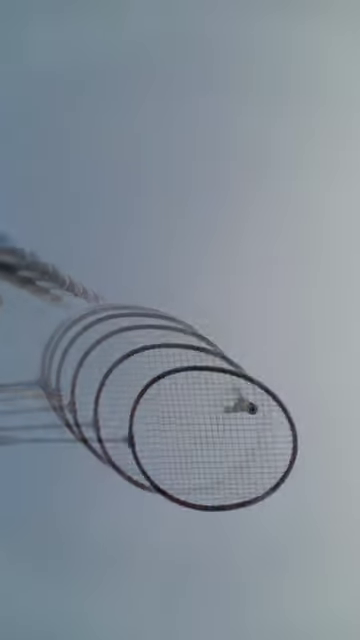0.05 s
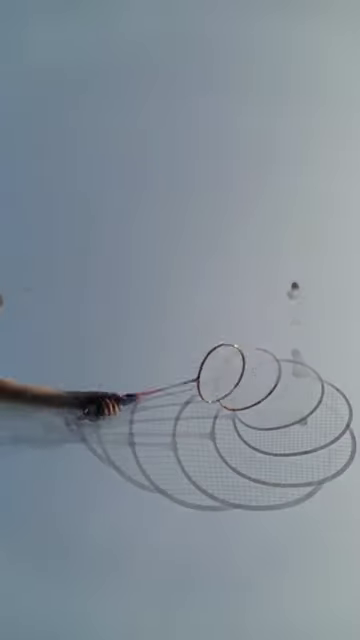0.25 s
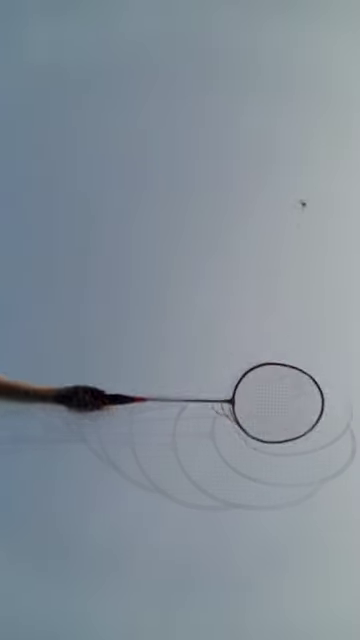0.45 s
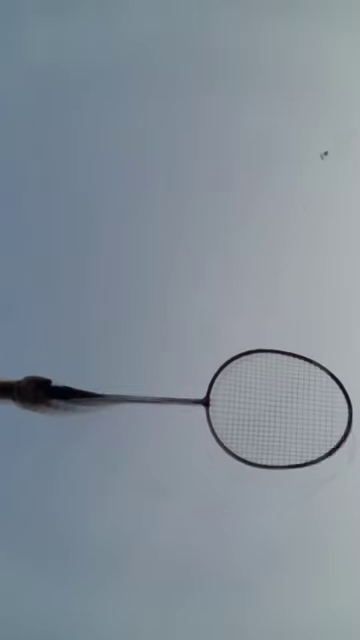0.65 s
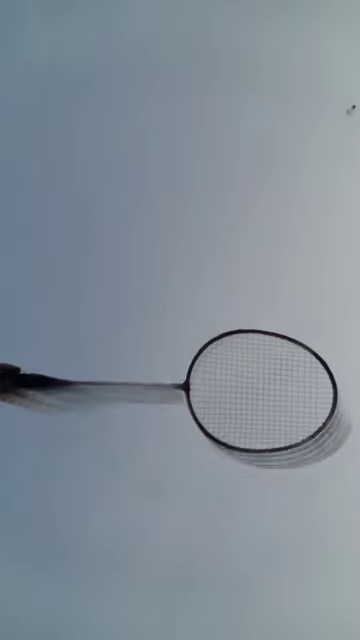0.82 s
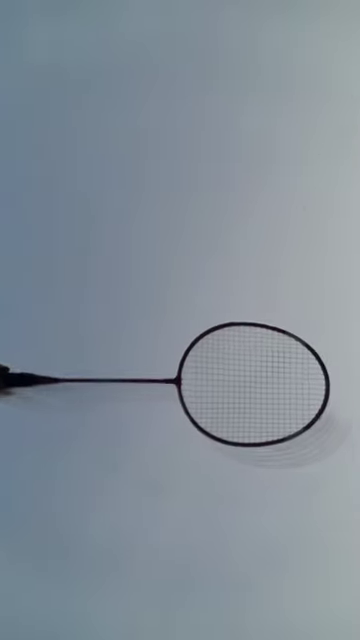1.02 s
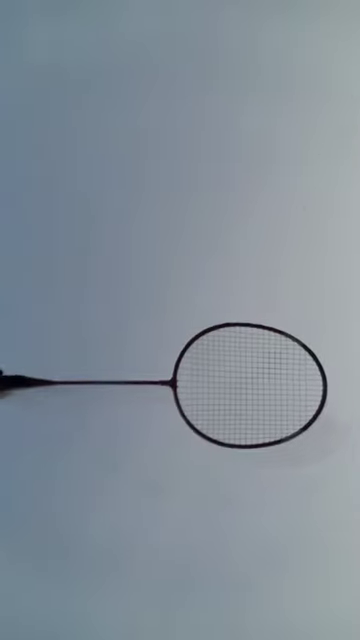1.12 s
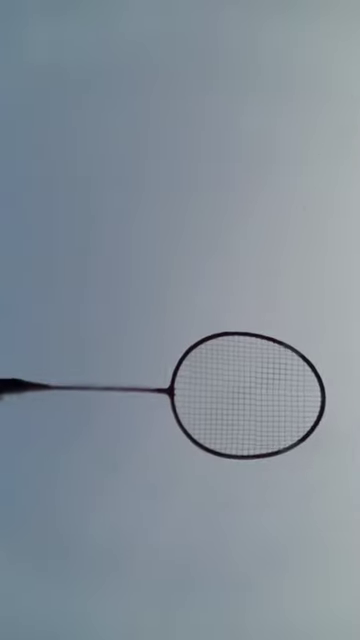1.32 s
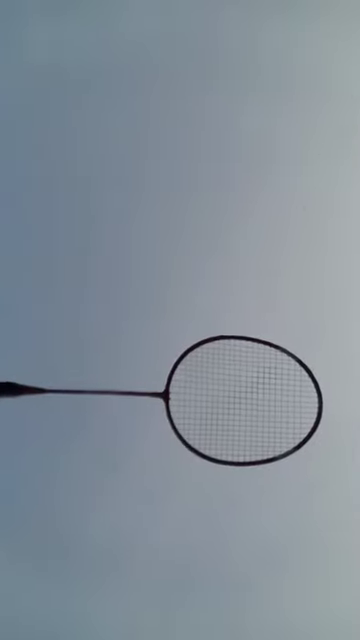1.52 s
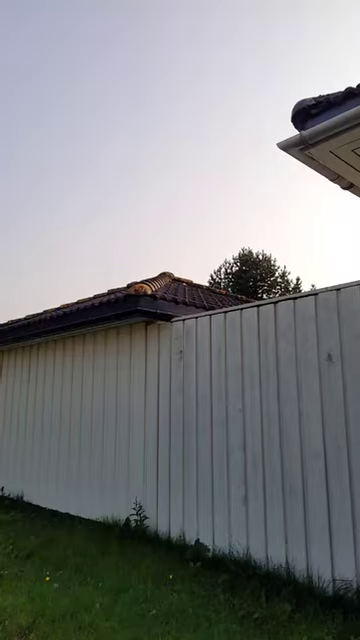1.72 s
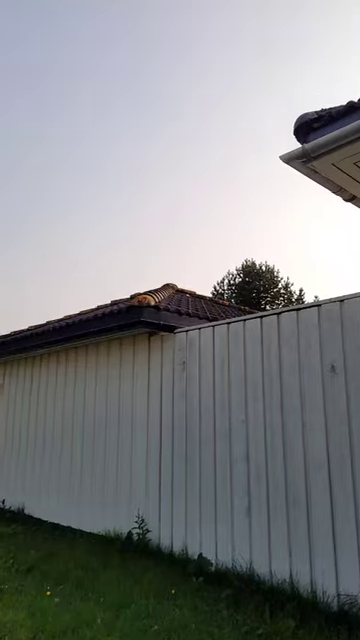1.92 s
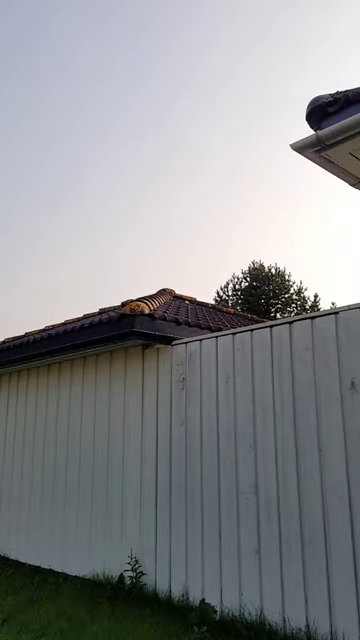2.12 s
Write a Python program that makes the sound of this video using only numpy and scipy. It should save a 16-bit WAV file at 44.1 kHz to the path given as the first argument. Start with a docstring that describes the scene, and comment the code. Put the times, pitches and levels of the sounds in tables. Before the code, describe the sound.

A badminton racket swishes and strikes a shuttlecock once, a sharp crack with a brief ping of strings. Faint finger ticks and sleeve rustles on the microphone follow, over a low rumble in a still garden.

```python
"""Over a low rumble in a still garden, a badminton racket swishes up and strikes a shuttlecock once. Cork and
feathers crack on the strings, the recoiling string bed thumps the air, and its modes ring while a fence and
a house reflect the crack. The lowest mode fades and swells again as the racket face turns, and the racket
swings softly back. Fingers then tick and a sleeve rustles on the microphone's case, and a far drone swells
once. After a brief silence the background is quieter, with a far machine hum and a last few ticks."""
import sys
import numpy as np
from scipy import signal
from scipy.fft import rfft, irfft
from scipy.io import wavfile

SR = 44100
rng = np.random.default_rng(int(sys.argv[2]) if len(sys.argv) > 2 else 0)


def wav_out(sig):
    """Save sig, one row per channel (or a flat mono array), as 16-bit PCM at SR to the path in sys.argv[1]."""
    wavfile.write(sys.argv[1], SR, np.round(np.clip(np.atleast_2d(sig).T, -1, 1) * 32767).astype(np.int16))


N = 94815
T = np.arange(N) / SR
HIT_S, BREAK_S, RESUME_S = 0.2393, 1.75, 1.776   # first touch of the shuttle; start and end of the silence
BED_PAN_DB, AIR_LIKENESS = -1.83, 0.76


def from_db(db):
    """Amplitude ratio of a level in decibels."""
    return 10 ** (np.asarray(db) / 20)


def rms_one(x):
    """Normalisation to unit rms."""
    return x / np.sqrt(np.mean(x ** 2) + 1e-20)


def in_time(rows):
    """Linear interpolation of each column after the time column, at every sample."""
    s, *columns = np.transpose(rows)
    return [np.interp(T, s, c) for c in columns]


def pan(db):
    """Level difference between the ears: left and right gains, positive leaning left."""
    return from_db(np.array([[db], [-db]]))


def envelope(start, rise, hold, t60):
    """Linear rise, hold, then exponential decay of 60 dB in t60; all in seconds."""
    t = T - start
    return np.clip(t / rise, 0, 1) * 1e-3 ** (np.maximum(t - rise - hold, 0) / t60)


def stereo(three, likeness):
    """Partial coherence: the ears share one signal (power fraction likeness) and each has its own."""
    return np.sqrt(likeness) * three[0] + np.sqrt(1 - likeness) * three[1:]


def noise(likeness):
    """White noise, partly coherent between the ears."""
    return stereo(rng.standard_normal((3, N)), likeness)


def grains(per_s, likeness):
    """Shot noise: random stereo impulses of either sign."""
    occurs = rng.random((3, N)) < per_s / SR
    return stereo(occurs * rng.choice([-1, 1], (3, N)), likeness)


def colour(x, spectrum):
    """Spectral shaping to unit rms. Each row: frequency in Hz, relative spectral density in dB."""
    hz, db = np.transpose(spectrum)
    f = np.maximum(np.arange(N // 2 + 1) * SR / N, 1)
    gain = from_db(np.interp(np.log(f), np.log(hz), db)) * (f > 10)
    return rms_one(irfft(rfft(x) * gain, N))


def resonance(x, hz, width_hz):
    """Damped oscillator: a unit impulse starts a decaying sine of height 1."""
    r, w = np.exp(-np.pi * width_hz / SR), 2 * np.pi * hz / SR
    return signal.lfilter([0, np.sin(w)], [1, -2 * r * np.cos(w), r * r], x + 1e-18)


def delayed(x, seconds):
    """Pure delay: a phase lag proportional to frequency."""
    hz = np.arange(N + 1) * SR / (2 * N)
    return irfft(rfft(x, 2 * N) * np.exp(-2j * np.pi * hz * seconds))[:N]


def crack():
    """Impact noise: cork and feathers rattle across the strings in a burst of tiny collisions."""
    # Each row: frequency in Hz, relative spectral density in dB.
    spectrum = [(300, -5.5), (800, -7.5), (1250, -1), (2200, -1), (2800, 2), (4500, 3.5), (5600, -6),
                (6700, -2), (8700, -22), (9400, -19.5), (10400, -16.5), (12500, -21.5), (14200, -11),
                (15300, -6), (16000, -19)]
    rattle = colour(grains(per_s=2900, likeness=0.59), spectrum)
    return from_db(-32.5) * pan(0.56) * rattle * envelope(HIT_S, rise=0.0017, hold=0.005, t60=0.02)


def thump():
    """Elastic rebound: the bed throws the shuttle back and pushes the air, over the head's slower recoil."""
    peak_s, rise_s, fall_s, push_hz = 0.2455, 0.0026, 0.0021, 343.2
    recoil_hz, recoil_width_s = 139, 0.0041
    t = T - peak_s
    pulse = np.exp(-(t / np.where(t < 0, rise_s, fall_s)) ** 2)
    push = np.cos(2 * np.pi * push_hz * t) * pulse
    recoil = np.cos(2 * np.pi * recoil_hz * t) * np.exp(-(t / recoil_width_s) ** 2)
    return from_db(-20) * push * pan(BED_PAN_DB) + from_db(-34) * recoil


def racket_modes():
    """Free vibration: the frame's modes and the string bed's upper modes ring and are quickly damped."""
    # Each row: frequency in Hz, level in dB, time to decay by 60 dB in seconds.
    modes = [(220, -41, .1), (623, -49, .21), (672, -44, .24), (834, -53, .2), (931, -47, .21),
             (982, -52, .2), (1040, -46.5, .28), (1093, -52, .18), (1185, -49, .25), (1238, -47, .09),
             (1448, -49, .13), (1941, -43, .06), (2180, -51, .11), (2688, -42, .065), (3420, -44, .08),
             (4075, -47, .06), (4918, -44, .055)]
    return sum(from_db(db) * np.sin(2 * np.pi * (hz * T + rng.random()))
               * envelope(HIT_S + 0.0021, rise=0.0037, hold=0, t60=t60) for hz, db, t60 in modes)


def ping():
    """Directivity: the bed's lowest mode fades as the face turns edge-on and swells as it turns back."""
    # Each row: time in seconds, frequency in Hz, rms level in dB.
    lowest_mode = [(.24, 393, -39.5), (.27, 417.4, -41.5), (.305, 412, -45.5), (.35, 417.7, -59),
                   (.395, 420, -73), (.47, 426.3, -62.5), (.55, 427.3, -65.5), (.62, 429, -81),
                   (.8, 422.6, -100)]
    hz, db = in_time(lowest_mode)
    contact_s, rise_s = 0.007975, 0.00437
    t = T - HIT_S - contact_s   # it rings once the shuttle has left
    phase = 2 * np.pi * np.cumsum(hz * (t > 0)) / SR
    return np.sqrt(2) * from_db(db) * np.sin(phase) * np.clip(t / rise_s, 0, 1) * pan(BED_PAN_DB)


def echoes():
    """Specular reflection: fence and house return the first snap of the crack with a woody knock."""
    # Each row: delay in seconds, gain in dB.
    reflections = [(0.0393, -57), (0.0485, -43.5), (0.051, -51.5), (0.107, -67)]
    # Each row: frequency in Hz, relative spectral density in dB.
    spectrum = [(400, 0.5), (1300, 3), (3000, -7), (6500, -6.5), (9000, -15), (15000, -12.5)]
    knock_hz = 1405.5
    snap = colour(noise(likeness=0.18), spectrum)
    knock = from_db(5.5) * np.sin(2 * np.pi * knock_hz * T)
    return sum(from_db(db) * (snap * envelope(HIT_S + s, rise=0.00033, hold=0.0006, t60=0.013)
                              + knock * envelope(HIT_S + s, rise=0.0002, hold=0, t60=0.0051))
               for s, db in reflections)


def scatter():
    """Diffuse scattering: grass and bushes spread the crack into a short, dull tail."""
    # Each row: frequency in Hz, relative spectral density in dB.
    spectrum = [(150, -2), (400, 1), (1100, 2.5), (1800, -7.5), (4000, -13.5), (8000, -25.5),
                (15000, -23.5)]
    tail = colour(noise(likeness=0.3), spectrum)
    return from_db(-46.5) * tail * envelope(HIT_S, rise=0.0062, hold=0.0037, t60=0.26)


def swish():
    """Flow noise: air through the strings swells with the swing, and softly again on the way back."""
    # Each row of both: frequency in Hz, relative spectral density in dB.
    swing_spectrum = [(80, -6), (250, -8), (800, -21), (12000, -40.5)]
    back_spectrum = [(250, -4), (750, -3), (1500, -23), (9000, -24)]
    swing_s = 0.21
    swing_level = from_db(-68.5) * envelope(HIT_S - swing_s, swing_s, 0, 0.16) ** 2
    back_level = from_db(-81) * envelope(start=0.5, rise=0.2, hold=0.17, t60=0.53)
    swing = swing_level * colour(noise(AIR_LIKENESS), swing_spectrum)
    return swing + back_level * colour(noise(AIR_LIKENESS), back_spectrum)


def case(clicks, hard_db):
    """Resonance of the microphone's case: soft contacts favour its lower mode, hard ones a bare snap."""
    # Each row: frequency in Hz, bandwidth in Hz.
    modes = [(4400, 650), (6450, 590)]
    lower, upper = (resonance(clicks, hz, width_hz) for hz, width_hz in modes)
    snap = signal.sosfilt(signal.butter(2, 4000, "high", fs=SR, output="sos"), clicks + 1e-18)
    return from_db(-hard_db) * lower + upper + from_db(hard_db - 1) * snap


def ticks():
    """Impulse excitation: each sharp touch of a finger sets the case ringing."""
    # Each row: start in seconds, gain in dB, hardness in dB.
    touches = [(0.7433, -51.5, 10), (0.775, -65.5, 7.5), (.841, -62.5, 4), (1.308, -73, 18),
               (1.4025, -71, -0.5), (1.557, -70, 10), (2.059, -60, -8), (2.099, -58.5, 3),
               (2.1066, -65.5, -8), (2.119, -69, -6), (2.1372, -56, 6), (2.1453, -68.5, -7)]
    right = sum(from_db(db) * case(signal.unit_impulse(N, int(s * SR)), hard_db)
                for s, db, hard_db in touches)
    return np.array([delayed(right, seconds=0.00018), right])   # the hand is nearer the right side


def rustles():
    """Stick-slip friction: a sleeve slides over the case in tiny slips."""
    # Each row: start in seconds, hold in seconds, level in dB, hardness in dB.
    slides = [(0.742, 0.028, -84.5, -1.5), (1.232, 0.04, -81, 2), (1.262, 0.044, -84, 14),
              (1.399, 0.057, -87, 2), (1.537, 0.045, -88, 6.5), (2.055, 0.09, -81, -2)]
    slips = grains(per_s=2100, likeness=0.19)
    return sum(from_db(db) * rms_one(case(slips, hard_db)) * envelope(s, rise=0.0099, hold=hold, t60=0.22)
               for s, hold, db, hard_db in slides)


def drone():
    """Narrow-band noise: a faint, uneven low tone swells once, far away."""
    band = rms_one(resonance(rng.standard_normal(N), hz=265, width_hz=30))
    return from_db(-69) * band * envelope(start=1.015, rise=0.052, hold=0.11, t60=0.14)


def rumble_and_traffic():
    """Amplitude-modulated noise: outdoor rumble and far traffic slowly rise and fall."""
    # Each row of both: frequency in Hz, relative spectral density in dB.
    rumble_spectrum = [(25, -32.5), (55, 6), (80, -4), (120, -8.5), (180, -25), (400, -58.5)]
    traffic_spectrum = [(70, 6.5), (130, 1), (200, -4), (268, 1.5), (430, -10.5), (560, -17), (1000, -25),
                        (2000, -31.5), (5000, -48)]
    # Each row of both: time in seconds, level in dB.
    rumble_level = [(0, -57.5), (.12, -76.5), (.28, -59.5), (.46, -60), (.54, -74.5), (.9, -72.5),
                    (1.15, -61), (1.27, -69), (1.38, -58.5), (1.47, -64), (1.55, -55), (1.63, -68),
                    (1.71, -55.5)]
    traffic_level = [(0, -58), (.06, -70.5), (.6, -65), (1.12, -70.5), (1.45, -66.5)]
    rumble = from_db(in_time(rumble_level)[0]) * colour(noise(likeness=0.92), rumble_spectrum)
    traffic = from_db(in_time(traffic_level)[0]) * colour(noise(AIR_LIKENESS), traffic_spectrum)
    return rumble + traffic


def hum_and_rumble():
    """A line spectrum over a continuous one: a far machine hums above a quiet, steady rumble."""
    # Each row: frequency in Hz, rms level in dB.
    tones = [(424, -82.5), (484.5, -86), (904, -94)]
    # Each row: frequency in Hz, relative spectral density in dB.
    spectrum = [(20, -27), (72, 4.5), (110, -14.5), (200, -19), (450, -23), (650, -29.5), (920, -28.5),
                (1500, -39.5), (8000, -73)]
    hum = sum(np.sqrt(2) * from_db(db) * np.sin(2 * np.pi * (hz * T + rng.random())) for hz, db in tones)
    return hum + from_db(-66.5) * colour(noise(AIR_LIKENESS), spectrum)


def hiss():
    """Self-noise: the microphone adds a thin, steady hiss."""
    # Each row: frequency in Hz, relative spectral density in dB.
    spectrum = [(6500, 0), (9500, -4), (13000, 0)]
    return from_db(-82) * colour(noise(likeness=0.11), spectrum)


def scene():
    """Superposition of the stroke, its reflections, the handling and the garden's background."""
    left, right = crack() + thump() + racket_modes() + ping()
    racket = np.array([delayed(left, seconds=0.00006), right])   # it reaches the left ear later
    events = racket + echoes() + scatter() + swish() + ticks() + rustles() + drone()
    background = np.where(T < BREAK_S, rumble_and_traffic(), hum_and_rumble())
    return events + background * pan(-0.75) + hiss()


def record(dry):
    """Gating and low-pass filtering: the sound drops out briefly, and the highest treble is cut."""
    fade_out_s, fade_in_s, stopband_hz = 0.012, 0.003, 16200
    gate = np.clip(np.maximum((BREAK_S - T) / fade_out_s, (T - RESUME_S) / fade_in_s), 0, 1)
    return signal.sosfilt(signal.cheby2(16, 60, stopband_hz, fs=SR, output="sos"), dry * gate)


dry = scene()
out = record(dry)
wav_out(out)
```